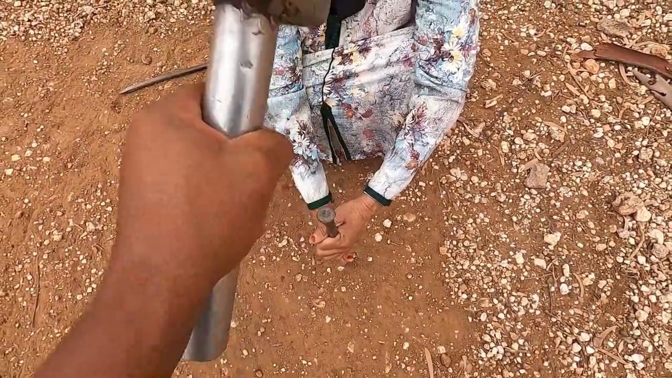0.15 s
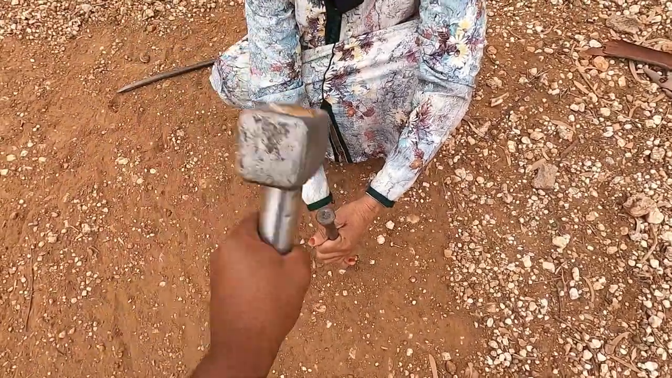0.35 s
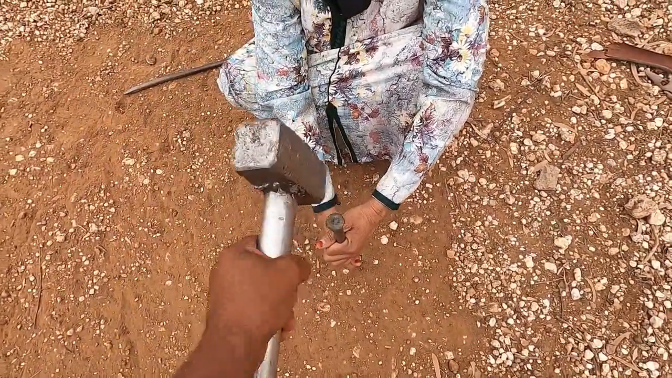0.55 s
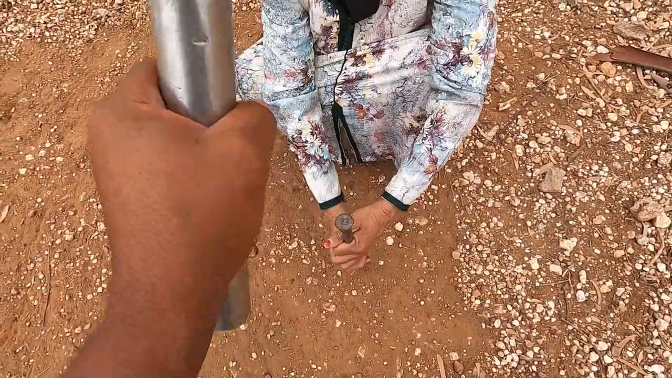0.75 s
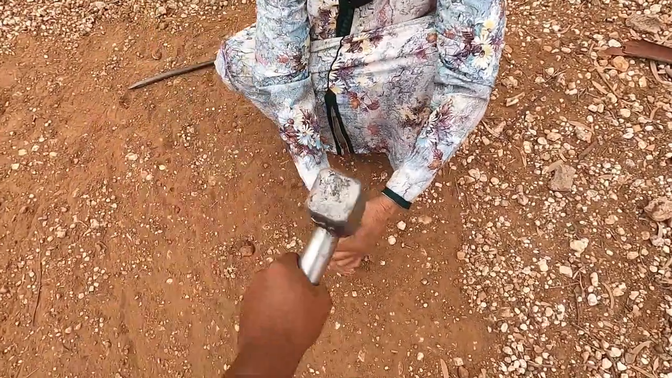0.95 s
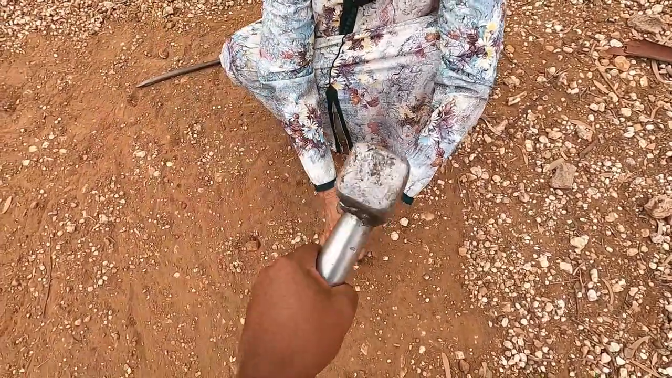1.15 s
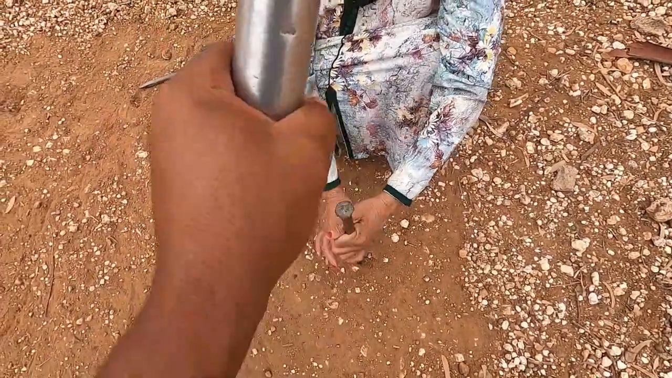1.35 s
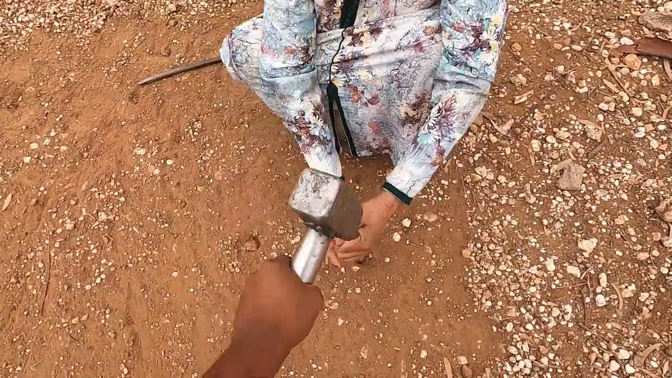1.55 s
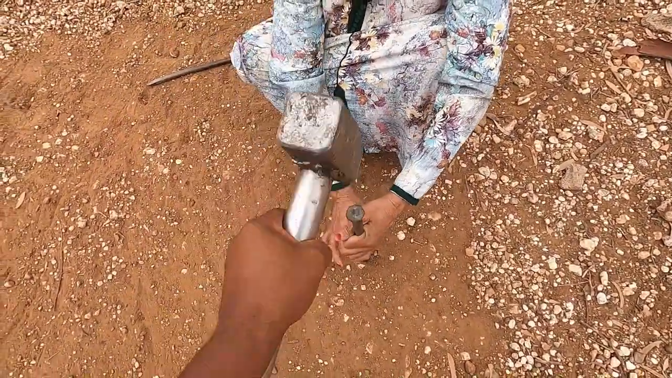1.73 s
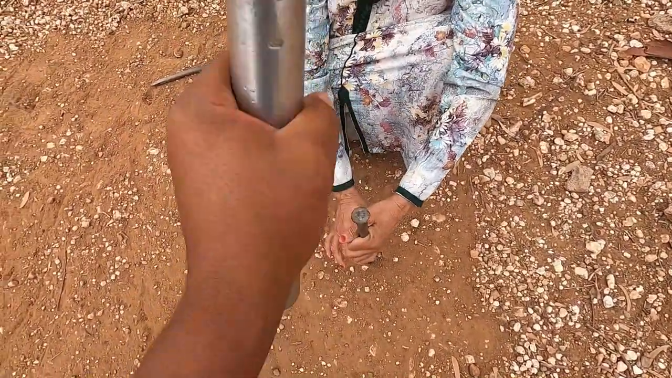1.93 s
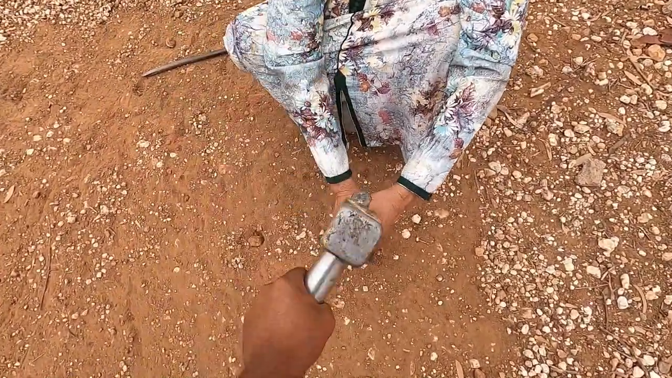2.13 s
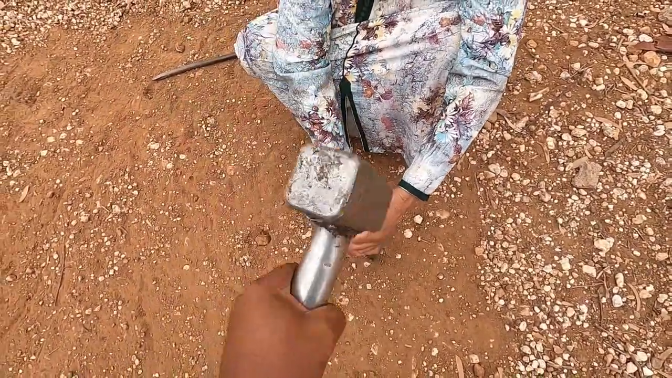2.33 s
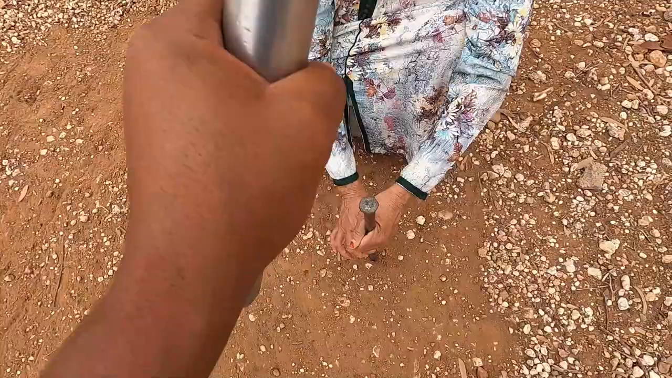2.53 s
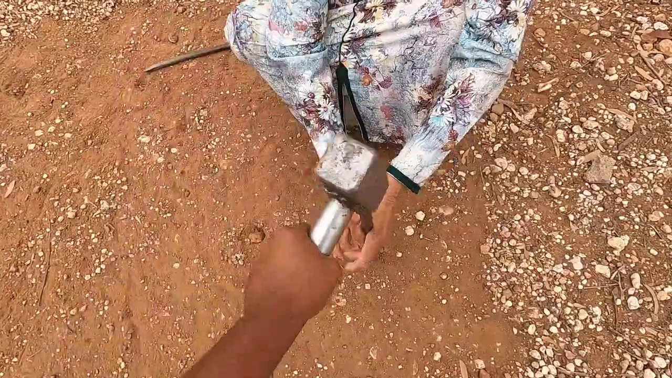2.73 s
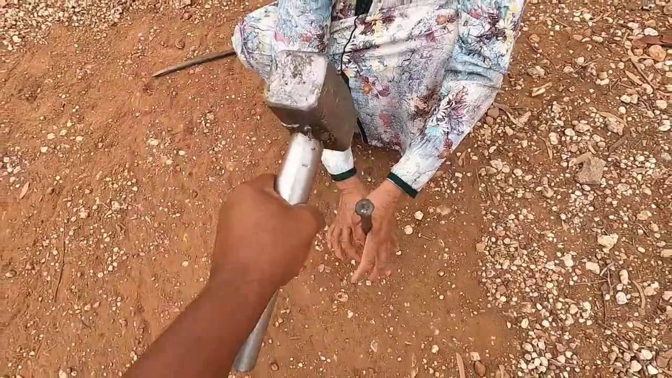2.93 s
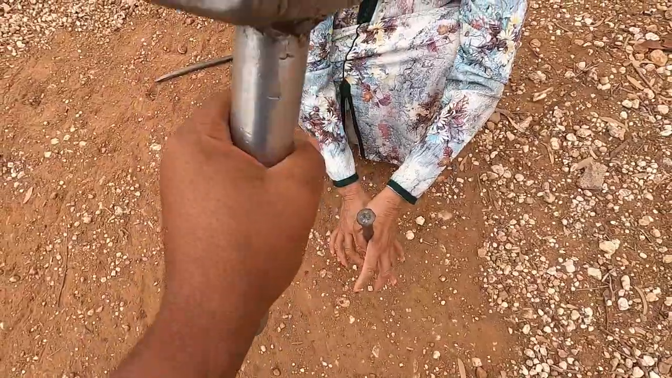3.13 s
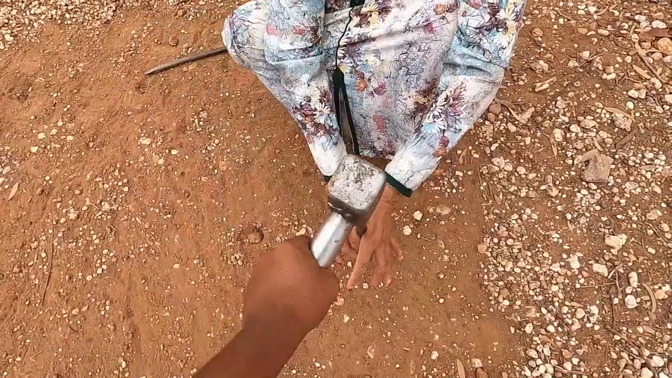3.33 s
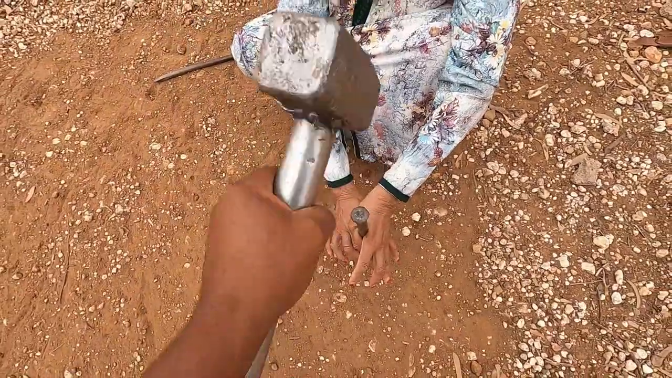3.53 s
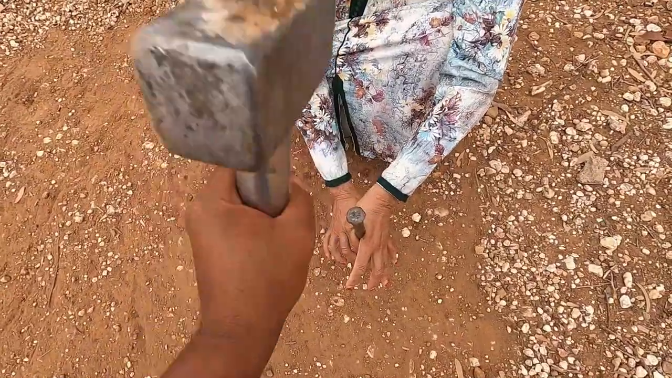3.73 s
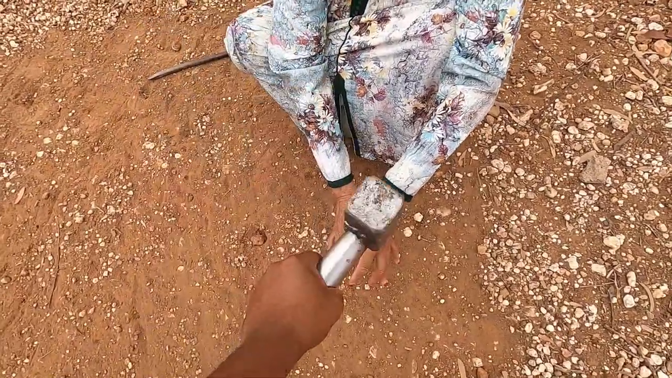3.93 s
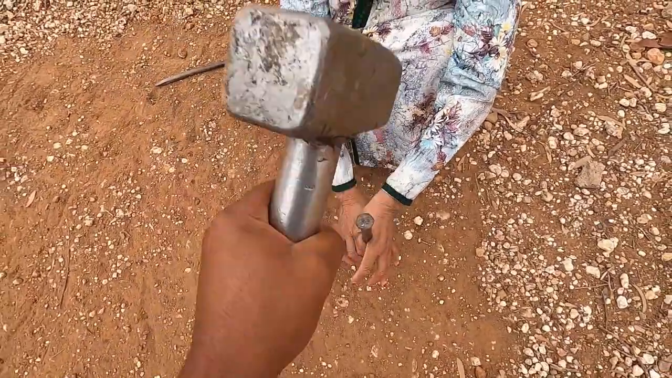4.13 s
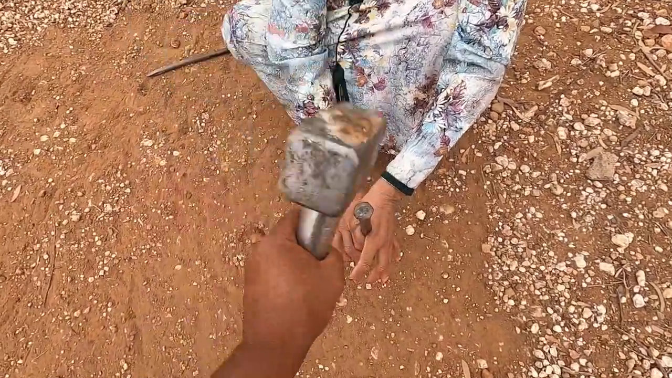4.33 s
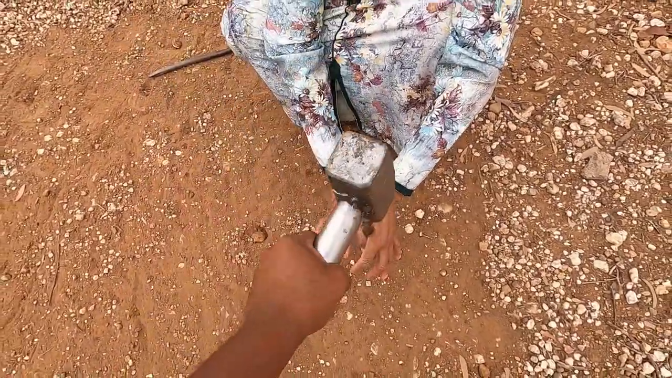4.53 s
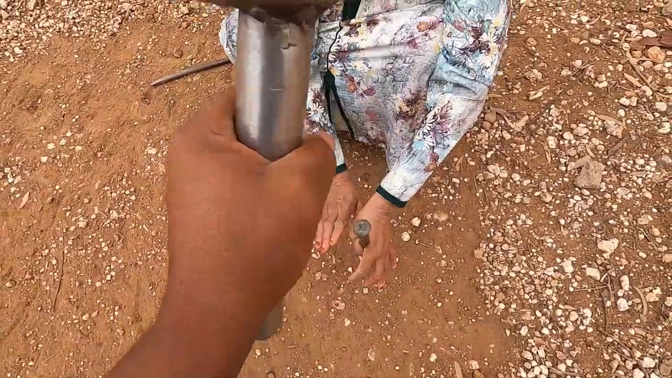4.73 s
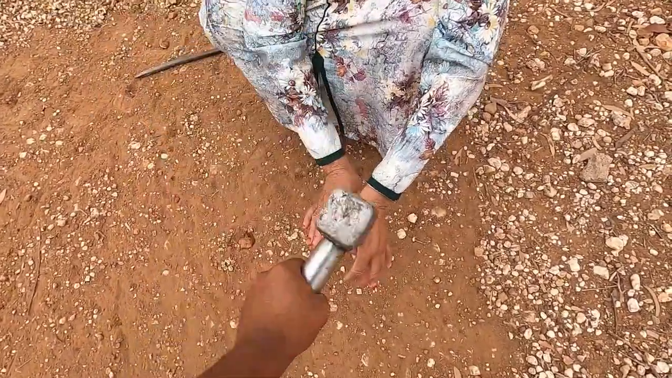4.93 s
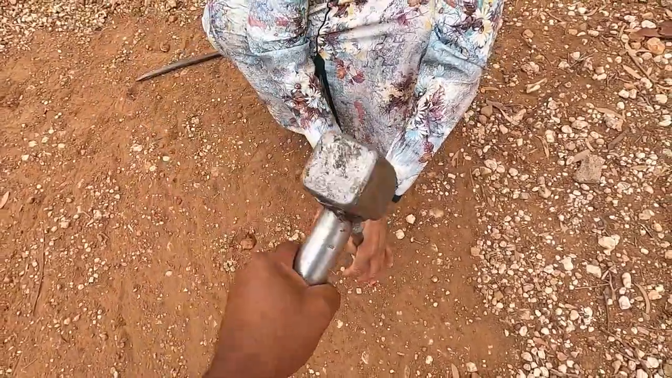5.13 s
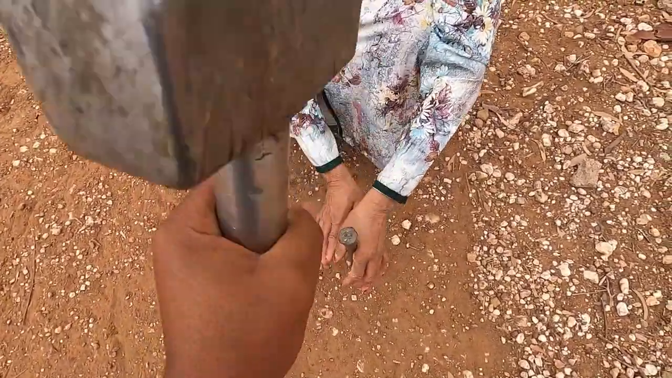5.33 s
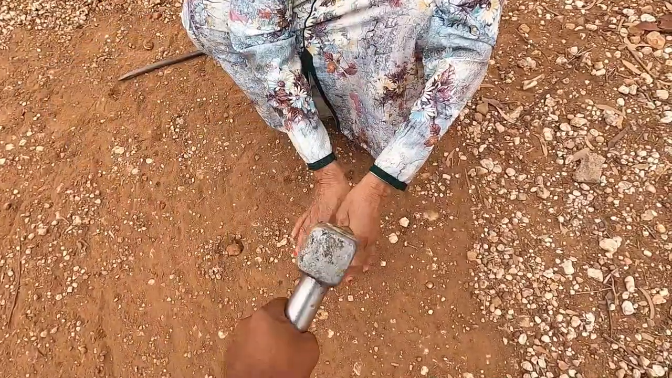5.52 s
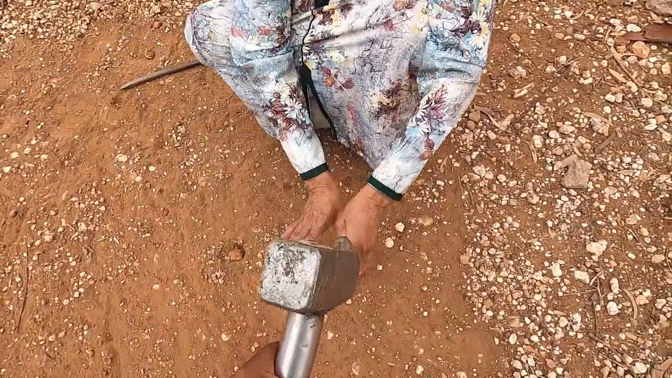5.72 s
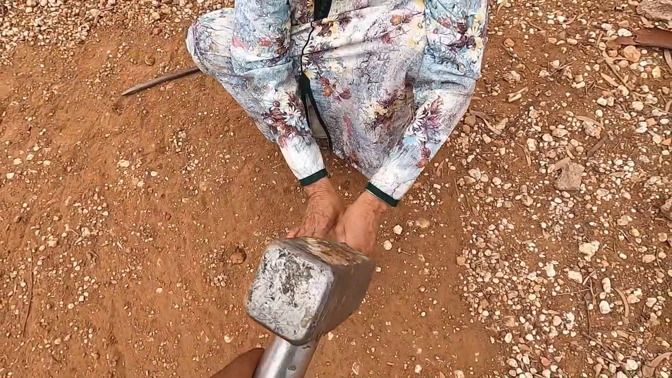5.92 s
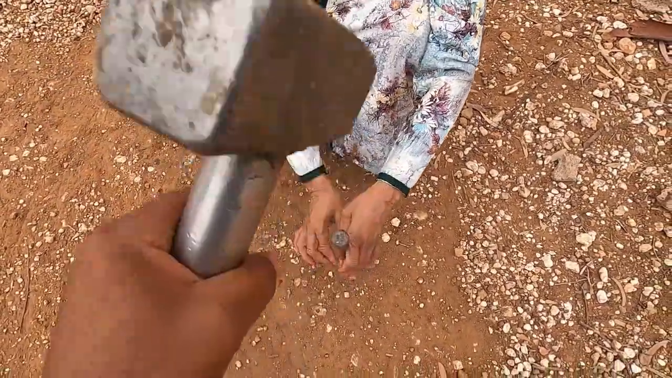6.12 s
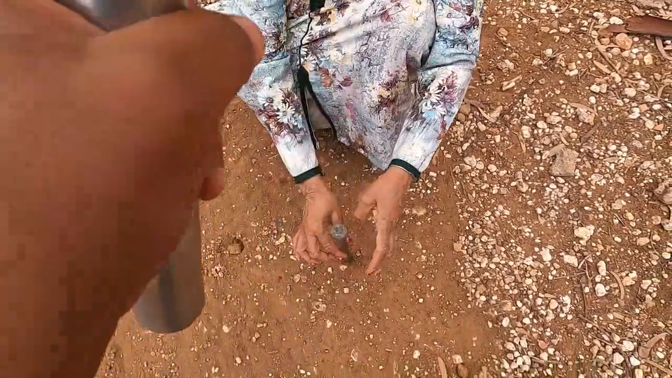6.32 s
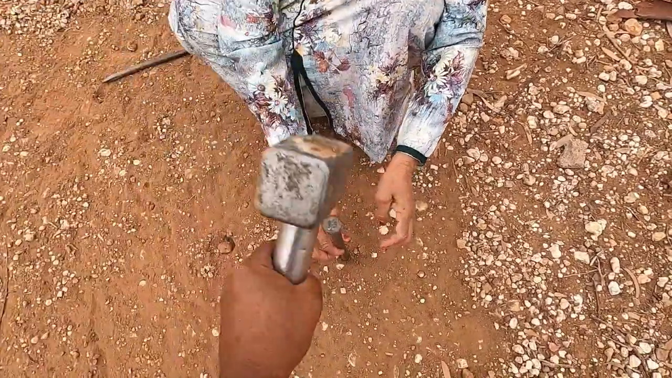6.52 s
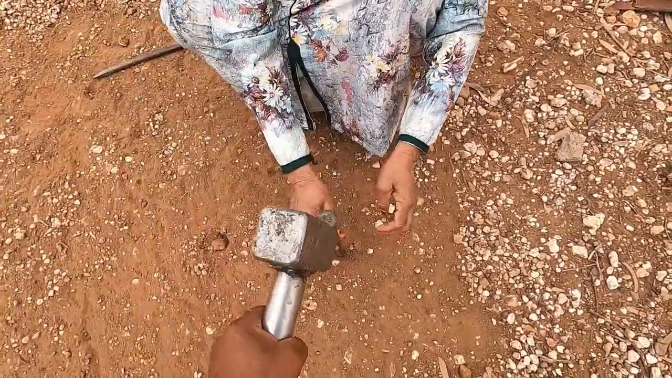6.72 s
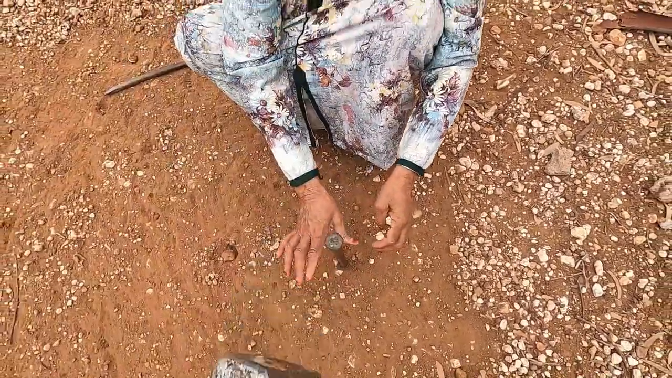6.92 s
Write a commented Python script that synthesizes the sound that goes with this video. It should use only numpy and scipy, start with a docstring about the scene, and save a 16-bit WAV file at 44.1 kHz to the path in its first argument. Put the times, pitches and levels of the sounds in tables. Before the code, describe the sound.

Steady hammering on a hand-held metal stake in stony ground, loud and dry, with a short tinny clank and dull thud in every blow. Low wind buffets the microphone unevenly and air rushes softly through scrub. Background dips briefly after each strike. Eleven regular blows are followed by a pause of about a second, where distant birds twitter faintly, before one final clank. Open outdoor space, little reverberation.

```python
"""Hammering a steel stake in gusty wind

A club hammer drives a steel stake into stony ground, close under a microphone in gusty wind.
Tones and hiss swell for some 40 ms into each blow; noise cracks, damped modes ring the steel and the ground,
and smeared noise puffs return as far echoes. Shaped noise makes the wind, the scrub and a few faint ticks.
Gliding sines make the whistles, chips and twitter of far birds, steady ones a honk; gain control ducks
the background after loud treble."""
import sys
import numpy as np
from scipy.fft import rfft, irfft, next_fast_len
from scipy.io import wavfile
from scipy.ndimage import uniform_filter1d, minimum_filter1d, map_coordinates

SR = 44100
rng = np.random.default_rng(int(sys.argv[2]) if len(sys.argv) > 2 else 0)


def transcribe(signal):
    """Save signal, clipped to [-1, 1], as a 16-bit WAV file at the path in sys.argv[1]."""
    frames = np.atleast_2d(signal).T
    limited = np.clip(frames, -1, 1)
    pcm = np.round(limited * 32767).astype(np.int16)
    wavfile.write(sys.argv[1], SR, pcm)


N = 307377


def amp(db):
    """Decibel law: level in dB to amplitude gain."""
    return 10 ** (np.asarray(db) / 20)


def unit(x):
    """Normalisation: x scaled to an rms of 1."""
    return x / np.sqrt(np.mean(x ** 2) + 1e-20)


def white(size):
    """White noise: independent normal samples, equal power at all frequencies."""
    return rng.standard_normal(size)


def coloured(x, spectrum):
    """Linear filtering: x through (Hz, dB) points joined on a log frequency axis."""
    m = next_fast_len(x.shape[-1] + 8192)
    f, db = np.transpose(spectrum)
    log_f = np.log(np.fft.rfftfreq(m, 1 / SR) + 1)
    gain = amp(np.interp(log_f, np.log(f), db, left=-120, right=-120))
    return irfft(rfft(x, m) * gain, m)[..., :x.shape[-1]]


def curves(rows):
    """Linear interpolation: one value per sample for each column after the time."""
    s, *cols = np.transpose(rows)
    return [np.interp(np.arange(N) / SR, s, c) for c in cols]


def wobble(rate):
    """Slow random fluctuation: a smooth scene-long curve, rate knots a second."""
    return map_coordinates(rng.standard_normal(int(N * rate / SR) + 4), [np.arange(N) * rate / SR])


def flicker(size, rate):
    """Fast random fluctuation: a smooth curve of size samples, rate knots a second."""
    return map_coordinates(rng.standard_normal(size // 64 + 4), [np.arange(size) * min(rate / SR, 1 / 64)])


def add(track, s, sound):
    """Superposition: mixes a sound into a track from s seconds on, cutting what falls outside."""
    at = round(s * SR)
    part = track[max(at, 0):at + len(sound)]
    part += sound[max(-at, 0):][:len(part)]


def ringing(modes, t, scatter_db, rough=0):
    """Modal decay: damped sines, struck at scattered strengths; rough ones flicker in size."""
    out = np.zeros(len(t))
    for hz, db, t60 in modes:
        decay = amp(db + scatter_db * rng.standard_normal() - 60 * t / t60)
        out += decay * (1 + rough * flicker(len(t), rate=200)) * np.sin(2 * np.pi * hz * t)
    return out


# Wind at the microphone port. Each row: time in seconds, buffet level in dB, flutter level in dB.
WIND = [(0, -24, -33.5), (.25, -38, -38), (.45, -28, -31.5), (.8, -33, -38), (1.1, -38, -36),
        (1.35, -37.5, -41.5), (1.7, -34.5, -38.5), (2.0, -34, -40.5), (2.2, -28.5, -33), (2.55, -37, -38),
        (2.72, -23.5, -29), (2.95, -24.5, -31), (3.1, -31, -40.5), (3.4, -26, -31), (3.7, -29, -38.5),
        (3.95, -26.5, -35.5), (4.2, -34.5, -41.5), (4.45, -30, -35.5), (4.8, -30.5, -41.5), (5.1, -36, -39),
        (5.3, -35, -44.5), (5.6, -28.5, -39.5), (5.9, -34, -42), (6.2, -38, -39), (6.6, -31.5, -33),
        (6.97, -33, -44)]
# Hard gusts that thump the port. Each row: centre in seconds, rise in dB, width in seconds.
GUSTS = [(0.392, 8.5, .02), (1.18, 7, 0.012), (1.82, 9, 0.013), (2.262, 20.5, .02), (2.9, 3, 0.032),
         (3.202, 0, 0.032), (3.861, 4.5, 0.0066), (4.119, 8, 0.012), (4.369, 4, 0.033), (4.7, 3.5, 0.012),
         (5.14, 10.5, 0.03), (5.921, 8, 0.017), (6.769, 7.5, 0.015)]
# Spectra of buffet, flutter and the flap of hard gusts. Each row: frequency in Hz, density in dB per Hz.
BUFFET = [(12, -29), (25, -0.5), (50, -1), (100, -3.5), (140, -11), (220, -43)]
FLUTTER = [(70, -35.5), (130, 1.5), (224, -2.5), (400, -16.5), (570, -26), (770, -31), (1100, -55)]
FLAP = [(80, -23), (150, 1.5), (300, -3), (600, -18), (900, -39)]


def port_wind():
    """Turbulent pressure: air buffets the microphone port in lumps of low-frequency noise."""
    buffet_db, flutter_db = curves(WIND)
    t = np.arange(N) / SR
    thump_db = sum(db * np.exp(-.5 * ((t - s) / width) ** 2) for s, db, width in GUSTS)
    buffet_db = buffet_db + thump_db + 1.2 * wobble(9)
    flutter_db = flutter_db + .3 * thump_db + 1.2 * wobble(7)
    lumps = wobble(22)
    buffet = unit(amp(1.6 * lumps) * coloured(white(N), BUFFET))
    flutter = unit(amp(2.1 * lumps + 2.2 * wobble(30)) * coloured(white(N), FLUTTER))
    flap = unit(amp(2.0 * wobble(37)) * coloured(white(N), FLAP))
    # the flap grows 1.7 dB for each dB of buffeting
    flap_db = 1.7 * (buffet_db + 14.5) - 23.5
    return amp(buffet_db) * buffet + amp(flutter_db) * flutter + amp(flap_db) * flap


# Wind in the scrub. Each row: time in seconds, rush level in dB, fizz level in dB.
RUSTLE = [(0, -59.5, -72), (.6, -60, -70.5), (1.1, -60.5, -73.5), (1.4, -63, -73.5), (1.7, -59, -78),
          (2.5, -58, -72), (2.81, -51.5, -73.5), (3.0, -59, -77.5), (3.36, -52, -73.5), (3.55, -60, -79.5),
          (3.9, -54.5, -77), (4.2, -59, -75), (4.5, -55, -76.5), (4.8, -61, -70.5), (5.1, -57.5, -74.5),
          (5.32, -66, -72), (5.59, -56.5, -69.5), (5.85, -62, -72), (6.2, -57.5, -70.5), (6.5, -52, -58.5),
          (6.65, -50.5, -61), (6.97, -66.5, -77)]
# Spectra of the rush and of the fizz above it. Each row: frequency in Hz, density in dB per Hz.
RUSH = [(500, -23.5), (900, -4.5), (1420, 1.5), (2200, -3.5), (3000, -12), (4500, -26.5), (7000, -37)]
FIZZ = [(2000, -18.5), (3700, -2.5), (5500, -7.5), (7300, -15.5), (8800, -17.5), (10500, -30), (15000, -47)]


def scrub_wind():
    """Broadband flow noise: further off, air rushes and fizzes through scrub."""
    rush_db, fizz_db = curves(RUSTLE)
    rush = unit(amp(0.53 * wobble(27)) * coloured(white(N), RUSH))
    fizz = unit(amp(2.4 * wobble(25)) * coloured(white(N), FIZZ))
    return amp(rush_db) * rush + amp(fizz_db) * fizz


# Spectrum of the microphone hiss. Each row: frequency in Hz, density in dB per Hz.
SELF_NOISE = [(7000, -19.5), (11000, -3.5), (13000, 0), (15600, -4)]


def self_noise():
    """Transducer self-noise: a steady, very faint treble hiss of the microphone."""
    return amp(-98.5) * unit(coloured(white(N), SELF_NOISE))


# The swell before each blow. Each row: hiss level in dB, level of the common tones in dB, then four tones
# of its own, each as frequency in Hz, level in dB.
SWELL = [(-17.5, -3, 2675, -13, 2600, -18, 3370, -18.5, 5910, -23.5),
         (-25, -1, 2100, -23, 3046, -11.5, 3900, -19, 6314, -20.5),
         (-16.5, -2.5, 3800, -13, 2777, -19, 3330, -12, 5200, -24.5),
         (-24, -9.5, 3600, -22.5, 3246, -26, 8300, -24, 6100, -24),
         (-18, -2, 1361, -16.5, 2478, -14.5, 3406, -6.5, 4350, -22),
         (-18, -1, 2594, -14, 2500, -4.5, 3138, -10.5, 6330, -23),
         (-18, -2, 2018, -18.5, 2380, -18, 3396, -12, 5600, -21.5),
         (-20.5, 2, 2578, -18, 2858, -17, 3900, -25.5, 5745, -17.5),
         (-24.5, -3, 2950, -11, 3127, -27, 3413, -14, 5750, -26),
         (-17, 4, 985, -11.5, 3300, -16.5, 3530, -13, 5920, -20.5),
         (-23, -6, 2282, -24, 2858, -17.5, 4090, -23.5, 6233, -24),
         (-20, -2.5, 2018, -21, 2780, -4.5, 3045, -5.5, 6320, -18.5)]
# Tones of every swell, before their scatter. Each row: frequency in Hz, level in dB.
COMMON = [(700, -27), (890, -30.5), (980, -22), (1360, -28.5), (3450, -25), (4340, -30), (4900, -33.5),
          (5500, -33.5), (6450, -35), (8800, -33), (10300, -37)]
# Spectra of the hiss and of its uppermost band. Each row: frequency in Hz, density in dB per Hz.
HISS = [(300, -21), (700, -7), (2000, -19), (2900, -1.5), (3700, -15.5), (6000, -25), (7300, -35.5),
        (9500, -26.5), (11500, -37), (13000, -48.5), (15500, -55)]
SIZZLE = [(6000, -30), (8500, -2), (10500, 0), (13000, -10), (15600, -14.5)]


def swell(lead=0.044, top=0.047):
    """Additive synthesis: flickering tones and hiss set in lead seconds before a crack, rise and stop on it."""
    out, size = np.zeros(N), SR // 16
    t = np.arange(size) / SR
    since = np.clip(t - t[-1] + lead, 0, None)
    started = since > 0
    growth = 0.0072 + np.sin(np.pi / 2 * since / top) ** 4.9
    rise = growth * started * np.clip((t[-1] - t) / .002, 0, 1)
    # a faint tick opens each swell
    tick = amp(-45 - 60 * np.abs(since - .004) / 0.013) * started
    for (s, *_), (hiss_db, common_db, *own) in zip(BLOWS, SWELL):
        tones = list(np.reshape(own, (-1, 2)))
        for hz, db in COMMON:
            detuned_hz = hz * (1 + .012 * rng.standard_normal())
            tones.append((detuned_hz, db + common_db + 1.8 * rng.standard_normal()))
        chord = np.zeros(size)
        for hz, db in tones:
            tone = np.sin(2 * np.pi * (hz * t + rng.random()))
            chord += amp(db) * (1 + 0.63 * flicker(size, rate=250)) * tone
        hiss = unit(coloured(white(size), HISS))
        sizzle = amp(-25) * unit(coloured(white(size), SIZZLE))
        add(out, s - t[-1], rise * (chord + amp(hiss_db) * (hiss + sizzle)) + tick * hiss)
    return out


# Modes of the hand-damped stake. Each row: multiple of its pitch, level in dB, 60 dB decay time in seconds.
STAKE = [(0.347, -15, 0.04), (0.471, -10.5, .03), (0.582, -13, 0.012), (.68, -18.5, .025),
         (0.821, -8.5, 0.023), (0.931, -13.5, 0.023), (1.002, 4.5, 0.032), (1.061, -18.5, 0.016),
         (1.16, -19.5, 0.037), (1.533, -21, 0.039), (2.05, -20, 0.027), (2.35, -17.5, 0.022),
         (3.05, -36, 0.04), (.55, 1.5, .007)]
# Spectrum of the crack. Each row: frequency in Hz, density in dB per Hz.
CRACK = [(180, -32), (400, -6.5), (1000, -17), (2000, -6), (2900, -0.5), (3700, -21), (6500, -21.5),
         (9000, -32), (12000, -42.5), (15500, -63.5)]


def clank(t, pitch_hz):
    """Impact excitation: a noise crack in two decays over the short modal ring of the damped stake."""
    modes = [(k * pitch_hz, db, t60) for k, db, t60 in STAKE]
    stake = ringing(modes, t, scatter_db=2.44, rough=0.2)
    noise = unit(coloured(white(len(t)), CRACK))
    crack = noise * (1 - np.exp(-t / 0.00082)) * (amp(-3 - 60 * t / 0.014) + amp(-12.5 - 60 * t / 0.036))
    # the head bounces and touches the stake once more
    crack += noise * amp(-17.5 - 60 * np.abs(t - .0065) / 0.014)
    return amp(-6) * stake + crack


# Modes of the ground. Each row: frequency in Hz, level in dB, 60 dB decay time in seconds.
THUD = [(124, -5.5, 0.054), (160.3, -4, 0.073), (214.7, 2.5, 0.056), (274.4, 2, 0.04), (328, -8, 0.047)]


def thud(t):
    """Delayed modal response: the ground gives way a moment after the steel."""
    return (1 - np.exp(-(t / 0.0079) ** 3)) * ringing(THUD, t, scatter_db=2.5)


# Modes of the handle and of the hammer head.
# Each row: frequency in Hz, level in dB, 60 dB decay time in seconds.
HANDLE = [(1093, 0, .9)]
HEAD = [(2880, 6, .3), (4330, 1, .5), (6130, -7, .4), (8640, -2, .5), (10500, -12, .35)]


def hammer_ring(t, handle_db, head_db):
    """Modal ringing with contact damping: handle and head come up after the clank, the grip stops the handle."""
    # the grip tightens on the rebound
    grip = np.exp(-(t / .185) ** 4) * (1 - np.exp(-(t / .036) ** 4))
    handle = grip * ringing(HANDLE, t, scatter_db=0.5, rough=0.17)
    head = (1 - np.exp(-t / .04)) * ringing(HEAD, t, scatter_db=2.0, rough=0.94)
    return amp(handle_db) * handle + amp(head_db) * head


# Far surfaces. Each row: delay in seconds, level in dB before scatter, spread in seconds.
ECHOES = [(.04, -59, 0.053), (.086, -50.5, 0.0086), (.12, -67.5, .04), (.16, -61.5, 0.013),
          (.25, -73, 0.063)]
# Echo colour, the steel's resonances. Each row: frequency in Hz, density in dB per Hz.
FAR = [(1500, -17), (2900, -1), (3300, -8), (3650, -4), (4350, -5), (5200, -16.5), (6100, -4),
       (7000, -15.5), (8000, -19), (8650, -7.5), (9300, -18.5), (10500, -15.5), (11300, -40.5)]


def echoes(t):
    """Diffuse reflection: rough far surfaces smear each echo into a puff of noise."""
    puffs = np.zeros(len(t))
    for lag, db, spread in ECHOES:
        puffs += amp(db + 2.5 * rng.standard_normal()) * np.exp(-.5 * ((t - lag) / spread) ** 2)
    return puffs * unit(coloured(white(len(t)), FAR))


# Hammer blows. Each row: start in seconds, crack level in dB, stake pitch in Hz, thud level in dB,
# handle ring level in dB, head ring level in dB, echo level in dB.
BLOWS = [(0.0366, -2.5, 2836, 1, -40, -55, -1.5), (0.5912, -0.5, 2873, -2, -44.5, -60, -2),
         (1.1571, -1, 2926, -4.5, -46, -65, -4.5), (1.743, -2.5, 2774, -1.5, -52.5, -56.5, -3),
         (2.2991, 0.5, 2905, -3, -52, -64, -4.5), (2.935, -3, 2830, -2.5, -43.5, -68, -8),
         (3.4915, -2, 2784, -4, -63.5, -74.5, -5), (4.0232, -1, 2797, -4, -60, -73, -5.5),
         (4.5827, -2, 2862, -2.5, -59.5, -67, -4), (5.136, -0.5, 2883, -3, -60, -72, -3.5),
         (5.679, -1.5, 2766, -1.5, -57.5, -63, -3.5), (6.7542, -4.5, 2764, 0.5, -47.5, -68.5, -8)]


def hammer():
    """Superposition of impact responses: each blow sums clank, thud, hammer ring and echoes."""
    out, t = np.zeros(N), np.arange(SR // 2) / SR
    for s, crack_db, pitch_hz, thud_db, handle_db, head_db, echo_db in BLOWS:
        blow = amp(crack_db) * clank(t, pitch_hz) + amp(thud_db) * thud(t)
        blow += hammer_ring(t, handle_db, head_db) + amp(echo_db) * echoes(t)
        add(out, s, blow)
    return out


# Faint ticks. Each row: time of the peak in seconds, level in dB.
TICKS = [(.185, -62), (.321, -65.5), (2.259, -51), (4.404, -58.5), (5.467, -64)]


def faint_ticks():
    """Noise bursts: short ticks, one as a swell opens, each a brief puff of band-shaped noise."""
    out, t = np.zeros(N), np.arange(SR // 50) / SR
    spectrum = [(800, -19), (1500, 0.0), (8500, -23.5), (10000, -45.5)]  # Hz, dB per Hz
    for s, db in TICKS:
        puff = amp(-60 * np.abs(t - .003) / 0.021) * white(len(t))
        add(out, s - .003, amp(db) * unit(coloured(puff, spectrum)))
    return out


# Whistled notes, each a list of points. Each row: time in seconds, frequency in Hz, level in dB.
WHISTLES = [
    [(4.86, 4280, -89.5), (4.868, 4400, -66.5), (4.91, 5230, -76.5), (4.915, 5150, -80.5)],
    [(5.26, 3910, -66), (5.27, 3950, -71), (5.306, 3680, -62.5), (5.322, 3840, -62), (5.34, 3490, -87)],
    [(6.16, 3926, -79), (6.198, 3832, -64), (6.226, 3870, -63), (6.24, 3760, -78)],
    [(6.46, 3620, -68), (6.488, 3640, -54), (6.51, 3822, -48.5), (6.53, 4800, -59), (6.54, 4670, -70)],
]


def whistles(out):
    """Frequency modulation: the phase of each gliding whistle is the running sum of its frequency."""
    for note in WHISTLES:
        s, hz, db = np.transpose(note)
        t = np.arange(s[0], s[-1], 1 / SR)
        phase = 2 * np.pi * np.cumsum(np.interp(t, s, hz)) / SR
        add(out, s[0], amp(np.interp(t, s, db)) * np.sin(phase))


# Falling twitter. Each row: middle in seconds, first frequency in Hz, last frequency in Hz, level in dB.
TWITTER = [(4.928, 4900, 3600, -64), (4.944, 4600, 3450, -60), (4.96, 4200, 3450, -61),
           (4.975, 3950, 3550, -61), (4.988, 3850, 3600, -63)]


def twitter(out):
    """Linear downward chirp: each 20 ms note falls steadily in frequency."""
    t = np.arange(SR // 50) / SR
    for s, high_hz, low_hz, db in TWITTER:
        fall = 2 * np.pi * (high_hz * t + (low_hz - high_hz) * t * t / (2 * t[-1]))
        add(out, s - t[-1] / 2, amp(db) * np.hanning(len(t)) * np.sin(fall))


# Short rising chips. Each row: middle in seconds, middle frequency in Hz, level in dB.
CHIPS = [(6.253, 3700, -56), (6.297, 3900, -56), (6.297, 2100, -53), (6.34, 2100, -51), (6.34, 2700, -55),
         (6.387, 2150, -52), (6.39, 3750, -57), (6.43, 2200, -52), (6.473, 2050, -54), (6.517, 2250, -51),
         (6.61, 2250, -55), (6.693, 2100, -53), (5.46, 3050, -60)]


def chips(out):
    """Linear upward chirp with amplitude modulation: each 20 ms chip rises some 10 % with a rasp."""
    t = np.arange(SR // 50) / SR
    for s, hz, db in CHIPS:
        rasp = 1 + .6 * flicker(len(t), rate=400)
        rise = 2 * np.pi * hz * (.95 * t + 2.5 * t * t)
        add(out, s - t[-1] / 2, amp(db) * np.hanning(len(t)) * rasp * np.sin(rise))


# Partials of a far honk. Each row: frequency in Hz, level in dB.
HONK = [(566, -44), (849, -50), (1115, -56), (1690, -54)]


def honk(out):
    """Additive synthesis: one short honk sums a few steady partials."""
    t = np.arange(SR // 19) / SR
    partials = sum(amp(db) * np.sin(2 * np.pi * hz * t) for hz, db in HONK)
    add(out, 6.405, np.hanning(len(t)) ** .5 * partials)


def birds():
    """Scintillation: moving air roughens the level of all the calls together."""
    out = np.zeros(N)
    whistles(out)
    twitter(out)
    chips(out)
    honk(out)
    return out * (1 + .2 * wobble(120))


def scene():
    """Superposition: all sources and the hiss meet at one microphone, which feeds both channels."""
    mono = port_wind() + scrub_wind() + self_noise() + swell() + hammer() + faint_ticks() + birds()
    return np.tile(mono, (2, 1))


def record(dry):
    """Dynamic compression: gain drops after loud treble, more above the bass; then soft clipping, band limit."""
    highs = coloured(dry, [(300, -40.0), (700, 2.0), (22000, -6.0)])
    loud = np.abs(highs[0]) > .3
    hold, glide, late = round(.06 * SR), round(.045 * SR), round(.088 * SR)  # samples
    delayed = np.pad(loud, (late, 0))[:N]
    # 0 is full gain, 1 is fully ducked
    duck = -uniform_filter1d(minimum_filter1d(-1. * delayed, hold), glide)
    x = amp(-7 * duck) * highs + amp(-4 * duck) * (dry - highs)
    x = x / (1 + np.abs(x / .98) ** 5) ** (1 / 5)
    top_hz = 15700
    return coloured(x, [(1, 0), (top_hz, 0), (top_hz + 50, -60)])


dry = scene()
out = record(dry)
transcribe(out)
```